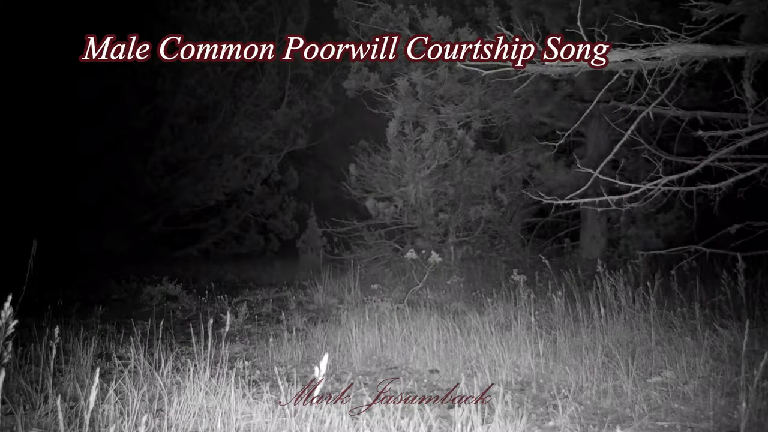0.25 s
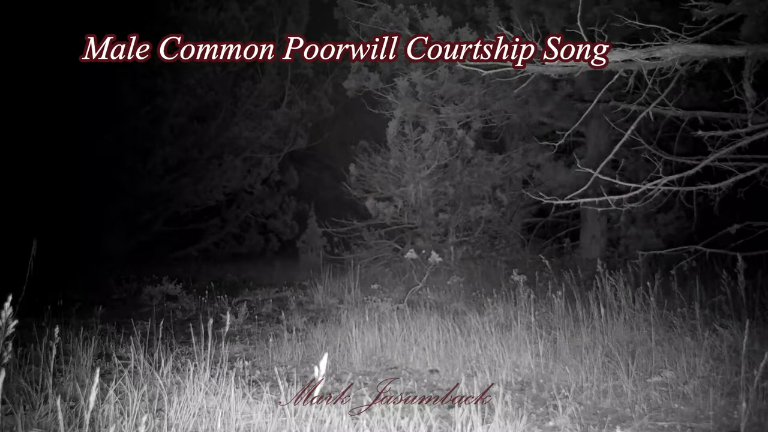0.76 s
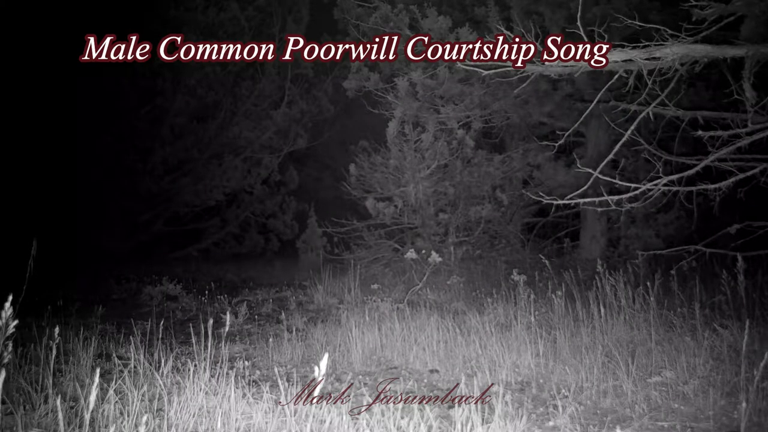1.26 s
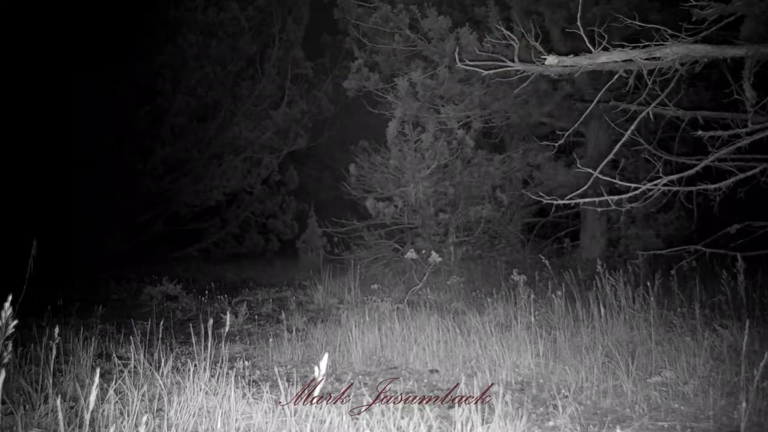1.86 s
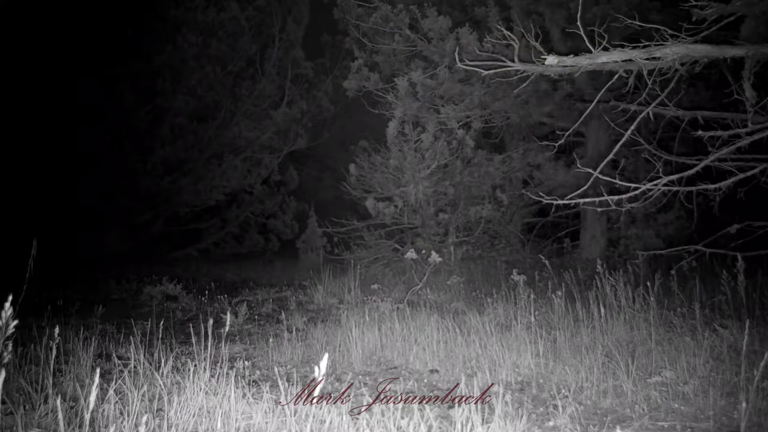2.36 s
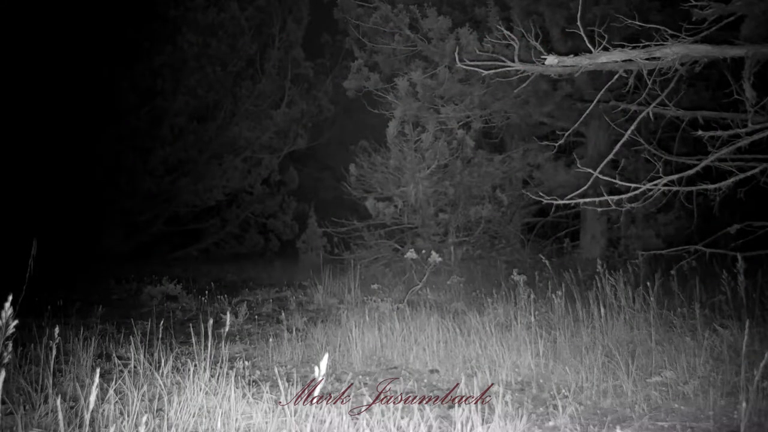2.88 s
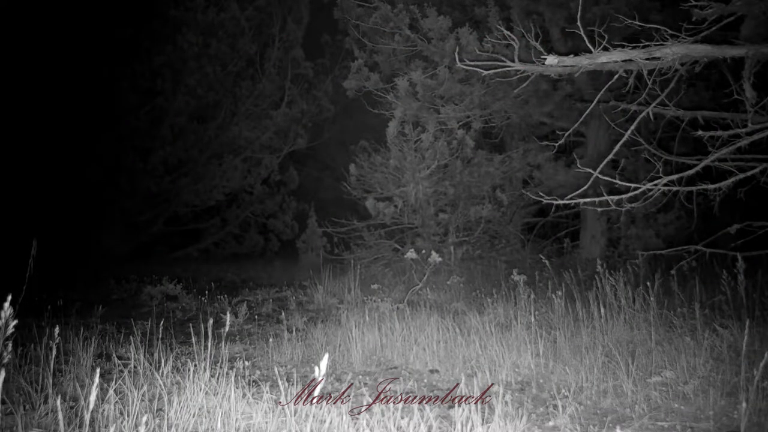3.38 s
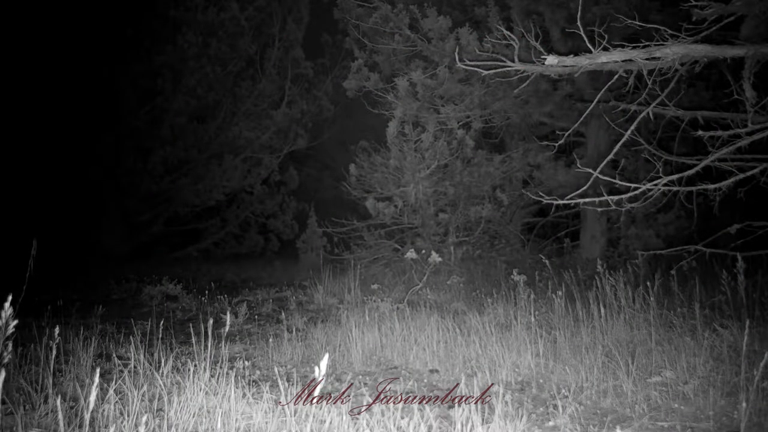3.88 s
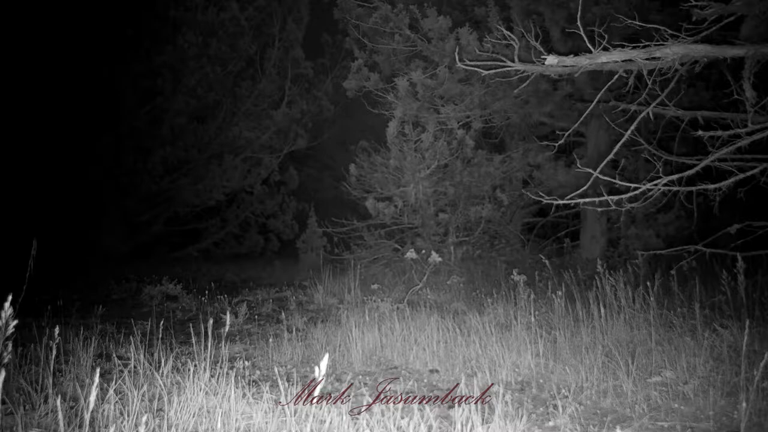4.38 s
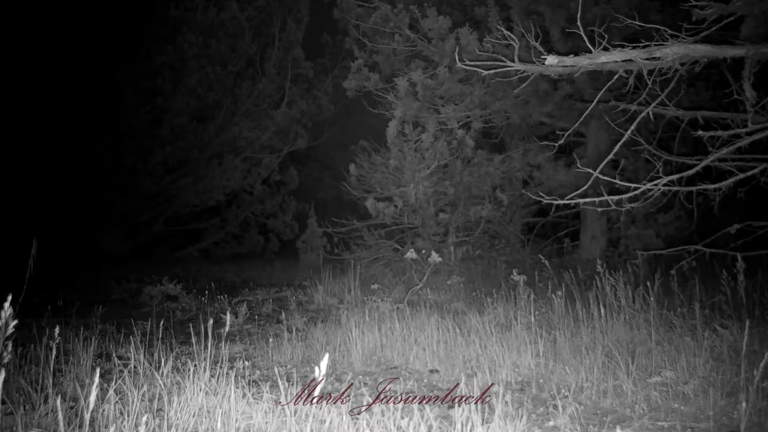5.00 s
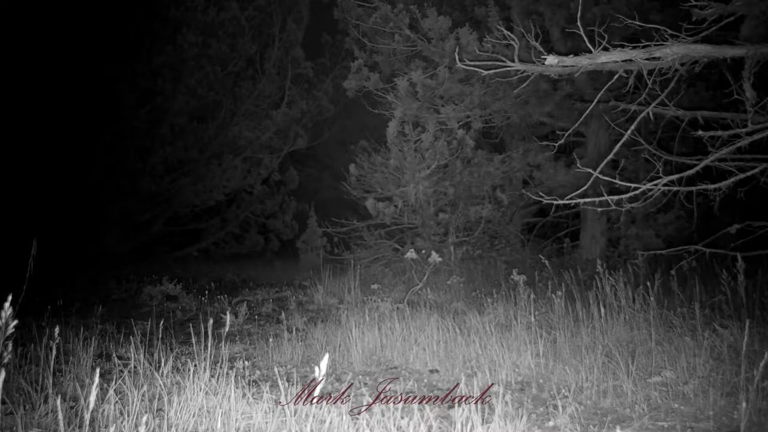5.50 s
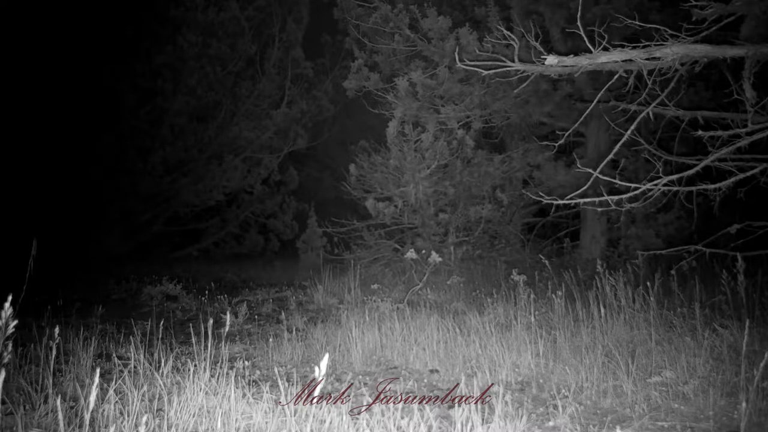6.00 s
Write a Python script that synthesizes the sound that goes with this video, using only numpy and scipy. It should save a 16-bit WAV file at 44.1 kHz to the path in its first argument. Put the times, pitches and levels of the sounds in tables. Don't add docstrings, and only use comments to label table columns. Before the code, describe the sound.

A dull click on the housing opens the scene, then a lone bird whistles paired gliding notes around mid pitch, six times at an even pace, blurred by woodland echoes. Beneath runs constant soft hiss with low rumble, small puffs of air and a thin lamp buzz. Faint thuds come after one second and a dry snap before two and a half. Grainy, narrow mono sound.

```python
import sys
import numpy as np
from scipy import signal
from scipy.fft import rfft, irfft
from scipy.io import wavfile
from scipy.ndimage import uniform_filter1d

SR = 44100
rng = np.random.default_rng(int(sys.argv[2]) if len(sys.argv) > 2 else 0)


def waveform_to_disk(signal):
    frames = np.transpose(np.atleast_2d(signal))
    scaled = np.clip(frames, -1, 1) * 32767
    samples = np.round(scaled).astype(np.int16)
    wavfile.write(sys.argv[1], SR, samples)


def elevation(decibels):
    levels = np.asarray(decibels, float)
    return 10 ** (levels / 20)


N = 275617


def add(mix, start_s, sound):
    part = mix[round(start_s * SR):][:len(sound)]
    part += sound[:len(part)]


def evened(x):
    return x / np.sqrt(np.mean(x ** 2) + 1e-20)


def whistle(rows):
    s, hz, db = np.transpose(rows)
    t = np.arange(s[0], s[-1], 1 / SR)
    attack, release = (t - s[0]) / 0.0015, (s[-1] - t) / 0.0014
    edges = np.clip(np.minimum(attack, release), 0, 1)
    phase = 2 * np.pi * np.cumsum(np.interp(t, s, hz)) / SR
    return np.sqrt(2) * elevation(np.interp(t, s, db)) * edges * np.sin(phase)


def sung(shape, start, level_db, pitch_hz, lift_hz, later):
    s, hz, db, lift_share = np.transpose(shape)
    s = start + s + later * (s == s[-1])
    hz = hz * pitch_hz / 1400 + lift_share * lift_hz
    return whistle(np.transpose([s, hz, db + level_db]))


# time after start in seconds, pitch in Hz, level in dB, share of lift 0-1.
FIRST_SHAPE = [
    (0, 1395, -2, 0),
    (.03, 1403, -0.5, 0),
    (.065, 1413, 0, 1),
    (.095, 1390, -1.5, 1),
    (.13, 1332, -6.5, 0.6),
    (.158, 1280, -13.5, 0.4),
    (.185, 1293, -10, .5),
]
# [s, Hz, dB, 0-1].
SECOND_SHAPE = [
    (0, 1302, -19, 0.1),
    (.022, 1368, -20, 0.06),
    (.042, 1561, -14, 0),
    (.066, 1590, -5.5, 0.9),
    (.087, 1452, -0.5, 0.04),
    (.105, 1393, 1, 0),
    (.13, 1404, -1.9, .5),
    (.156, 1398, -0.5, 1),
]
# start in seconds, level in dB, pitch in Hz, lift in Hz, lateness of the end in seconds.
FIRST_NOTES = [(0.2702, -44.5, 1401, -1, 0.0053), (1.337, -44.5, 1400, 13.5, 0.0056),
               (2.3528, -45, 1395, 4.5, 0.0059), (3.4228, -44, 1398, 6.5, -0.0021),
               (4.469, -44.5, 1397, -1, 0.0099), (5.5895, -45, 1401, 0.5, -0.0019)]
# [s, dB, Hz, Hz, s].
SECOND_NOTES = [(.4975, -45.5, 1396, 30, 0.0089), (1.571, -46, 1395, 33.5, -0.0034),
                (2.585, -46, 1395, 13, -0.0038), (3.6614, -45.5, 1397, -5.5, -0.0094),
                (4.7023, -45.5, 1402, 4.5, .002), (5.8259, -45.5, 1394, 6, -0.0074)]


def calls():
    song = np.zeros(N)
    for shape, notes in ((FIRST_SHAPE, FIRST_NOTES), (SECOND_SHAPE, SECOND_NOTES)):
        for row in notes:
            add(song, row[0], sung(shape, *row))
    return song


# start in seconds, pitch in Hz, level in dB, length in seconds.
CALL_ENDS = [
    (0.671, 1394, -60, 0.037),
    (1.732, 1430, -59, 0.053),
    (3.839, 1370, -63, 0.021),
    (4.873, 1334, -58, .022),
    (6.002, 1362, -58, 0.031),
    (1.81, 1403, -62, 0.032),
    (4.932, 1390, -61, .04),
    (6.07, 1394, -62, .045),
]


def hiccups():
    song = np.zeros(N)
    for s, hz, db, length in CALL_ENDS:
        begin = (s, 0.953 * hz, db + 6)
        middle = (s + 0.47 * length, hz, db)
        end = (s + length, 1.005 * hz, db - 19)
        add(song, s, whistle([begin, middle, end]))
    return song


# delay in ms, level against the direct sound in dB.
TRUNK_ECHOES = [(10.83, -10.0), (16.36, -17.0), (29.23, -2.1), (32.41, -11.2), (40.18, -14.1),
                (43.84, -14.9), (49.41, -17.8), (59.18, -15.2), (65.82, -20.1), (76.09, -18.8),
                (88.01, -21.6), (93.77, -24.8), (101.2, -24.6), (117.17, -19.1), (142.08, -30.1)]


def trees():
    wood_db, wood_t60_s, scatters_per_s = -17.5, 1.1, 1500
    t = np.arange(SR // 2) / SR
    tail = rng.standard_normal(len(t)) * (rng.random(len(t)) < scatters_per_s / SR)
    tail *= elevation(-60 * t / wood_t60_s) * (t > 0.06)
    paths = elevation(wood_db) * tail / np.linalg.norm(tail)
    paths[0] = 1
    for ms, db in TRUNK_ECHOES:
        paths[round(ms * SR / 1000)] += elevation(db)
    return paths


def bird():
    return elevation(0.24) * signal.fftconvolve(calls() + hiccups(), trees())[:N]


# time in seconds, peak in dB, length in ms, sign.
HOUSING_KNOCKS = [
    (.1501, -31, .65, 1),
    (.1738, -38, .45, 1),
    (1.2778, -39, 2.5, -1),
    (1.291, -40, 5, 1),
    (1.2972, -38, 2.2, -1),
]


def knocks():
    out, ms = np.zeros(N), np.arange(-400, 400) * 1000 / SR
    for s, db, length_ms, sign in HOUSING_KNOCKS:
        push = np.exp(np.minimum(ms, 0) / length_ms) * np.clip(1 - ms / (0.22 * length_ms), 0, 1)
        rebound = 0.35 * np.exp(-((ms / length_ms - 4) / 1.6) ** 2)
        add(out, s - 400 / SR, sign * elevation(db) * (push - rebound))
    return out


# time in seconds, peak in dB, pitch in Hz, length in ms.
DRY_TICKS = [
    (2.4165, -31.5, 3850, .4),
    (2.4167, -41, 2300, .6),
    (2.419, -46, 3850, .5),
    (.15013, -43, 3000, .15),
]


def ticks():
    out, ms = np.zeros(N), np.arange(-400, 400) * 1000 / SR
    for s, db, hz, length_ms in DRY_TICKS:
        ring = np.exp(-(ms / length_ms) ** 2) * np.cos(2 * np.pi * hz * ms / 1000)
        add(out, s - 400 / SR, elevation(db) * ring)
    return out


# place in the frame 0-1, size in dB, sign.
LAMP_SWITCHING = [
    (.268, -43.5, -1),
    (.752, -44, 1),
]


def buzz():
    frame_hz = 29.984
    t, out = np.arange(N) / SR, np.zeros(N)
    for place, db, sign in LAMP_SWITCHING:
        ms = ((t * frame_hz - place + 0.5) % 1 - 0.5) * 1000 / frame_hz
        spike = np.exp(-np.maximum(ms, 0) / 1.0) * np.clip(ms / 0.28, 0, 1)
        kick = np.exp(-((ms + 0.36) / 0.25) ** 2)
        out += sign * elevation(db) * (1.3 * spike - 0.42 * kick)
    return out


# frequency in Hz, density in dB per Hz.
HISS_COLOUR = [(7.1, -34), (12, -4), (76, -1), (109, -2.5), (215, -3), (261, -4.5), (309, -5), (467, -7.5),
               (503, -8), (1090, -13), (1330, -14), (2050, -15.5), (3950, -18.5), (5140, -66), (8690, -120)]


def steady_hiss():
    f, db = np.transpose(HISS_COLOUR)
    fine_hz = np.fft.rfftfreq(N, 1 / SR)
    colour = elevation(np.interp(np.log(fine_hz + 1), np.log(f + 1), db))
    return evened(irfft(rfft(rng.standard_normal(N)) * colour, N))


# time in seconds, half length in seconds,
# rumble rise in dB, rustle rise in dB.
AIR_PUFFS = [
    (0.063, 0.026, 0.5, 1.5),
    (0.176, 0.04, 1.5, 2.5),
    (1.01, 0.039, 2.5, -1.5),
    (1.27, 0.027, -1, 5),
    (1.41, 0.027, 2.5, 2),
    (2.403, 0.01, 1.5, 6),
    (4.986, .05, 1.5, -0.2),
    (5.56, 0.068, 2, -.4),
]


def hiss():
    split_hz, settle_db_per_s = 900, -0.14
    frames, hz = N // 128 + 5, np.fft.rfftfreq(512, 1 / SR)
    t = np.arange(frames) * 128 / SR
    patches = uniform_filter1d(rng.standard_normal((frames, len(hz))), 14, 0)
    patches = evened(uniform_filter1d(patches, 8, 1)).T
    s, half, rumble_rise, rustle_rise = np.transpose(AIR_PUFFS)
    puffs = np.exp(-((t[:, None] - s) / half) ** 2)
    rumble_db = -49 + settle_db_per_s * t + puffs @ rumble_rise
    rustle_db = -60 + puffs @ rustle_rise
    high = (hz ** 2 / (hz ** 2 + split_hz ** 2))[:, None]
    swell_db = (1 - high) * rumble_db + high * (rustle_db + 12.5)
    z = signal.stft(steady_hiss(), nperseg=512, noverlap=384)[2]
    z = z * elevation(swell_db + 0.54 * patches)[:, :z.shape[1]]
    return signal.istft(z, nperseg=512, noverlap=384)[1][:N]


def scene():
    return (bird() + knocks() + ticks() + buzz() + hiss())[None]


def low_pass(x):
    return signal.sosfilt(signal.butter(12, 15770, fs=SR, output="sos"), x)


def record(dry):
    camera_hz = 8000
    smooth = signal.oaconvolve(dry[0], signal.firwin(201, 4250, fs=SR), "same")
    t = np.arange(N) / SR
    slow_t = np.arange(0, t[-1], 1 / camera_hz)
    slow = np.interp(slow_t, t, smooth)
    joined = np.interp(t, slow_t, slow)
    return low_pass(joined[None])


dry = scene()
out = record(dry)
waveform_to_disk(out)
```